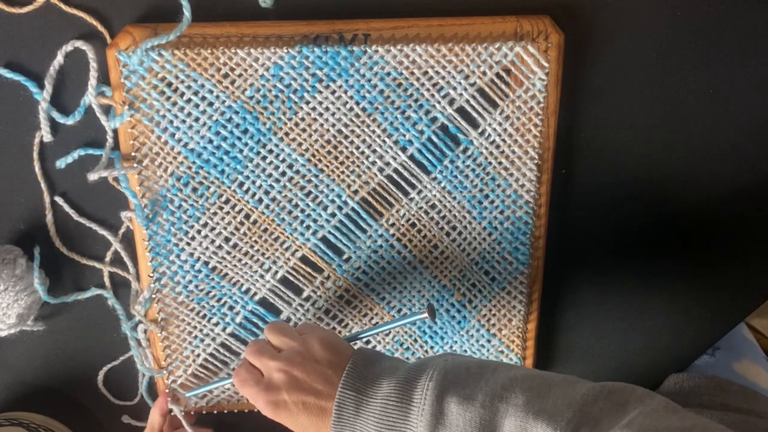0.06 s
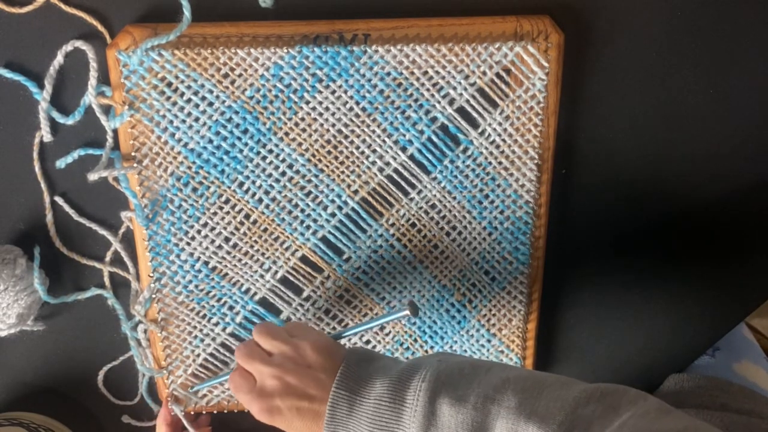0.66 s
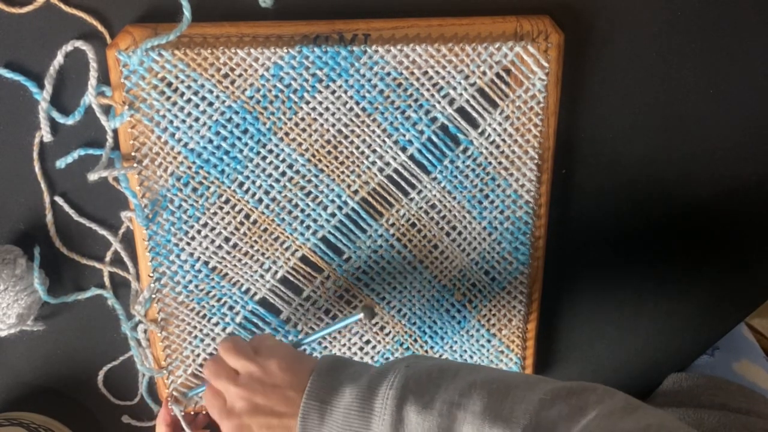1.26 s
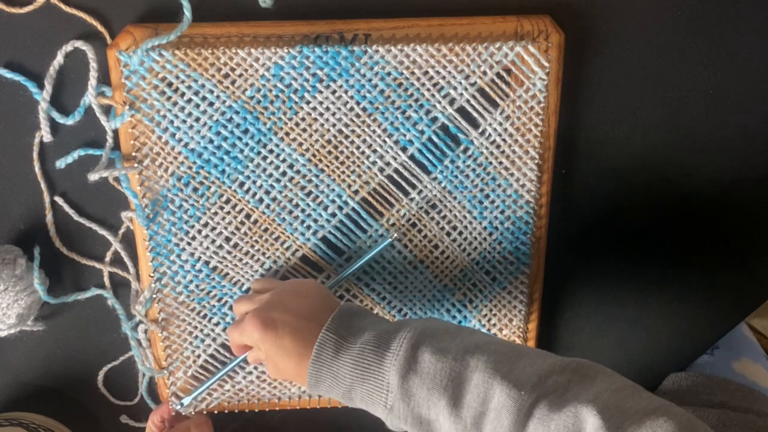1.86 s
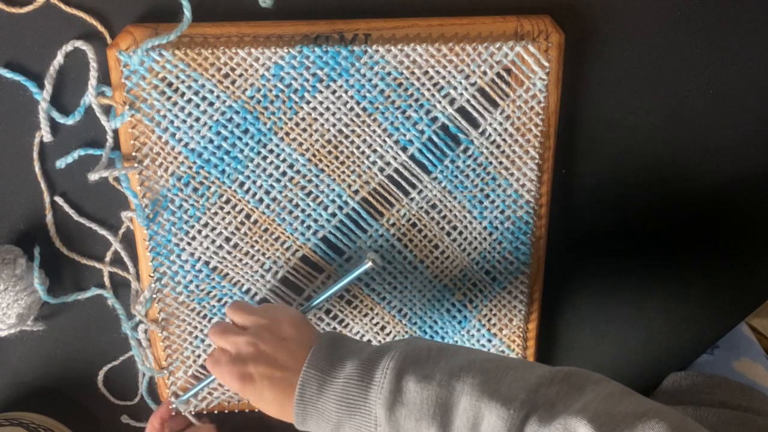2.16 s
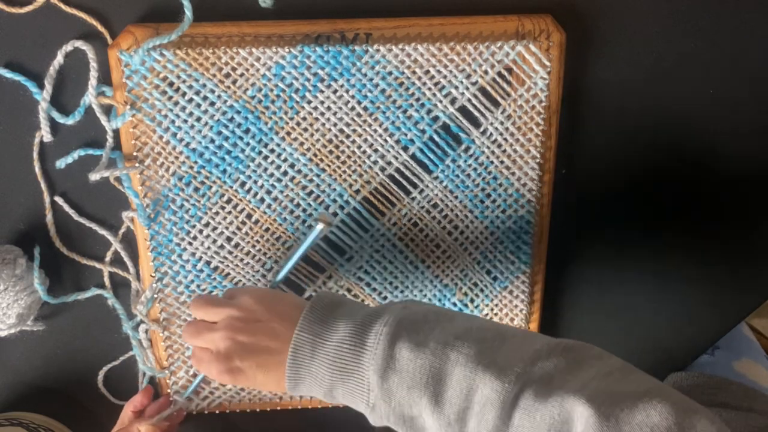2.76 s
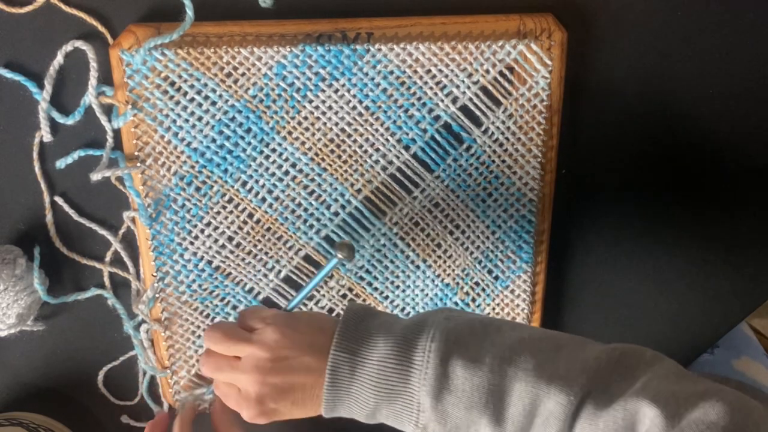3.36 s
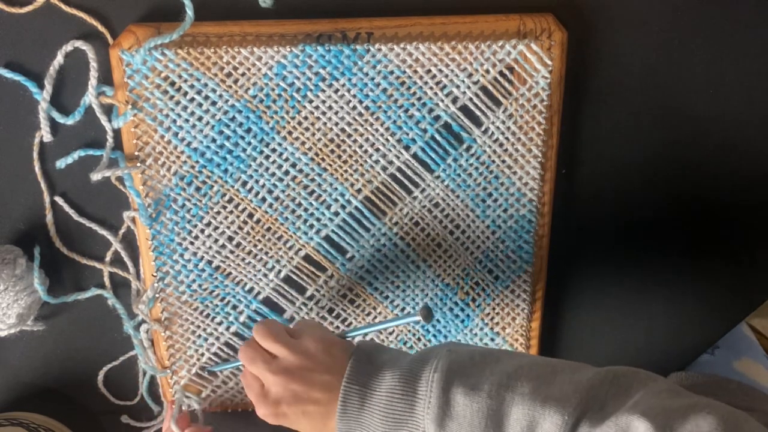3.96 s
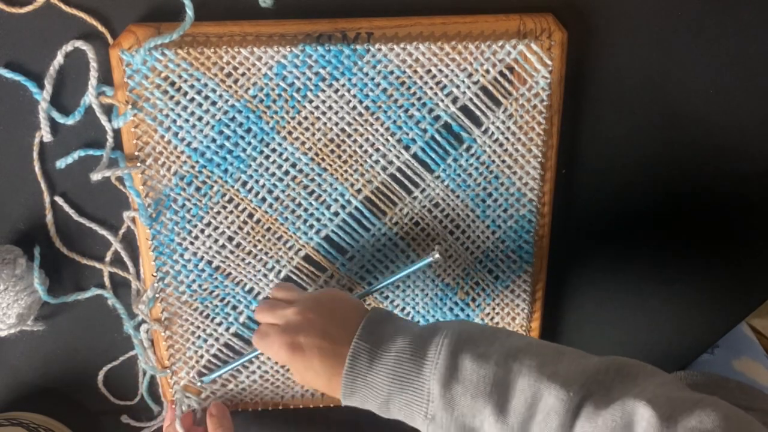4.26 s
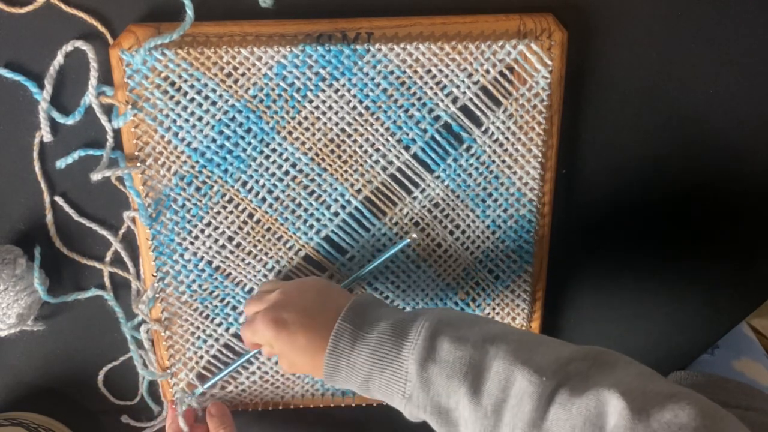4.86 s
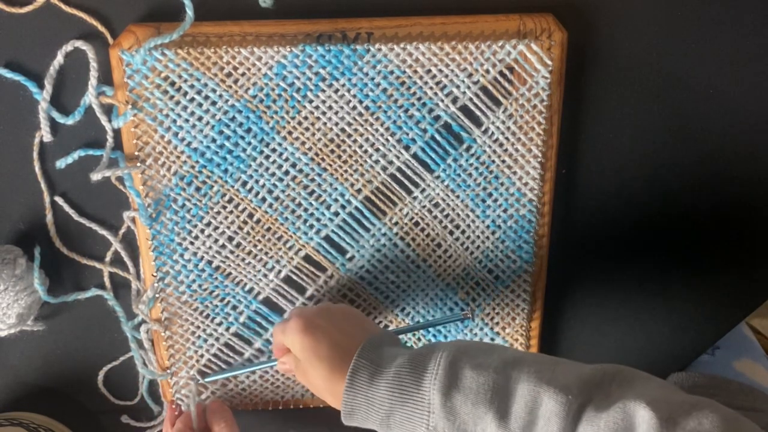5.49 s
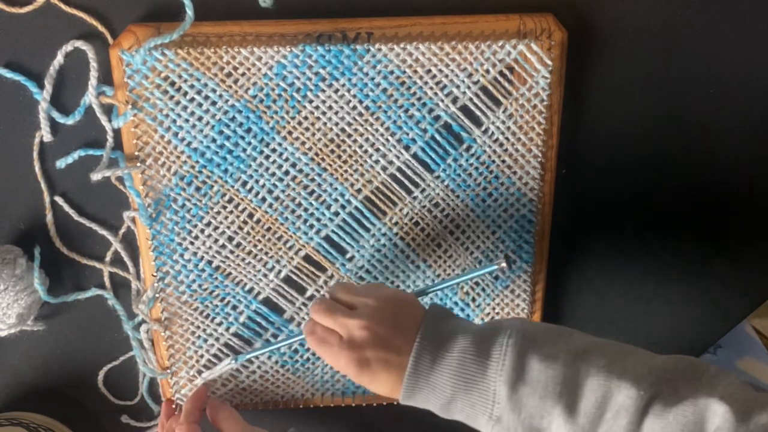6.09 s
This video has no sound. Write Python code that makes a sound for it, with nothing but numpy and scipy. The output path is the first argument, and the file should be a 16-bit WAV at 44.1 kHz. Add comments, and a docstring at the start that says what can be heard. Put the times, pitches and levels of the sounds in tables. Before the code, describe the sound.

A metal needle rubs softly through taut yarn on a wooden loom, with dull, hollow knocks and low thumps in a quiet room.

```python
"""In a quiet room's rumble and hiss, a long metal needle is woven through yarn on a wooden frame loom.
From the first stroke, yarn drags over the needle in tiny slips that ring the frame; the taut web drums
just after, then the loom rocks on its table. The hand's pushes thump and yarn scuffs faintly on the metal.
From 0.4 s threads snap off the tip and knock; from 1.2 s the tip now and then ticks on a peg. At 5.1 s
the rubbing rises in pitch on the short, taut corner threads; knocks and squeaks then crowd together."""
import sys
import numpy as np
from scipy import signal
from scipy.fft import rfft, irfft
from scipy.io import wavfile
from scipy.ndimage import uniform_filter1d

SR = 44100
rng = np.random.default_rng(int(sys.argv[2]) if len(sys.argv) > 2 else 0)


def generate_wav(signal):
    """Clip the signal to [-1, 1] and save it as 16-bit WAV at the path in sys.argv[1]."""
    frames = np.transpose(np.atleast_2d(signal))
    scaled = np.clip(frames, -1, 1) * 32767
    pcm = np.round(scaled).astype(np.int16)
    wavfile.write(sys.argv[1], SR, pcm)


N = 270330
T = np.arange(N) / SR
FREQS = np.maximum(np.fft.rfftfreq(N, 1 / SR), 1)

# Modes of the wooden frame, the yarn web and the loom on its table.
# Each row: frequency in Hz, relative level in dB, t60 in seconds at damping 1.
FRAME_MODES = [(285, -3, 0.24), (303.1, 1, 0.17), (317.9, 7, 0.069), (356.6, 4.5, 0.15),
               (333, -11.5, 0.019), (394.8, -8.5, 0.2), (442.3, -21, 0.099), (504.6, -20.5, 0.29),
               (533, -16, 0.14), (632.3, -18.5, 0.092), (691, -33.5, 0.22), (727, -30.5, 0.09),
               (750, -36.5, 0.032), (844, -45.5, 0.18), (1060, -48, 0.05), (1215, -49.5, 0.04)]
WEB_MODES = [(125.5, 2, 0.11), (143.35, 7.5, 0.17), (166.5, -19.5, 0.43), (189.1, -15.5, 0.19)]
ROCK_MODES = [(51.44, 3, 0.59), (74, 3, 0.12), (103.7, -12, 0.085)]
# Threads snapping off the needle. Each row: time in seconds, knock level in dB, knock pitch in Hz,
# crack level in dB, web level in dB.
SNAPS = [(0.421, -31, 336, -61, -37), (0.441, -40.5, 347, -52.5, -29.5), (0.584, -43.5, 344, -79, -50.5),
         (0.744, -37, 352.4, -49, -47.5), (1.190, -29.5, 382, -41.5, -22), (1.218, -32, 366, -45, -36.5),
         (1.242, -30.5, 368, -48.5, -22.5), (1.830, -28, 332, -45.5, -24), (1.968, -27, 353, -45, -39.5),
         (2.182, -23, 345, -47.5, -42.5), (2.456, -30.5, 353, -50, -32.5), (3.195, -33, 332, -43.5, -33),
         (3.666, -35, 337, -49, -28.5), (4.524, -33, 357, -46.5, -26), (5.017, -25, 375.4, -35.5, -33),
         (5.06, -28, 362, -35.5, -23), (5.463, -34.5, 330, -68, -53.5), (5.552, -30.5, 365, -61, -57),
         (5.587, -28.5, 368, -50, -46), (5.652, -28, 347, -55, -37.5), (5.690, -33, 380, -59.5, -41),
         (5.751, -29.5, 362, -50.5, -44), (5.794, -27, 409, -55, -36), (5.826, -35.5, 402, -56.5, -37.5),
         (5.878, -18, 331.3, -53, -22.5), (5.95, -28, 370, -52.5, -30)]


def undb(db):
    """Decibels to gain."""
    return 10 ** (np.asarray(db) / 20)


def unit(x):
    """Scale to rms 1."""
    return x / np.sqrt(np.mean(x ** 2))


def add(out, start_s, x):
    """Mix x into out at start_s."""
    i = max(int(start_s * SR), 0)
    out[i:i + len(x)] += x[:N - i]


def over_hz(points):
    """Interpolate (Hz, value) points over log frequency."""
    hz, value = np.transpose(points)
    return np.interp(np.log(FREQS), np.log(hz), value)


def noise(gain):
    """Noise of rms 1, shaped by a gain per frequency."""
    return unit(irfft(rfft(rng.standard_normal(N)) * gain, N))


def resonance(hz, width_hz):
    """Gain of a steep-skirted resonance."""
    return 1 / (1 + ((FREQS / hz - hz / FREQS) * hz / width_hz) ** 2)


def decay(t, t60_s):
    """1 until t = 0, then down 60 dB per t60_s."""
    return np.exp(-np.log(1000) * np.maximum(t, 0) / t60_s)


def ring(modes, swell_cycles, tilt_db_oct=0, damping=1, scatter_db=0, hold_s=0, sharp=0):
    """A body's response to one push, peak 1: each mode builds up, and fades after hold_s."""
    t, sag_s = T[:SR // 2], 0.023
    bent_s = t + sharp * sag_s * (1 - np.exp(-t / sag_s))  # stretched yarn starts sharp, then sinks
    out = 0
    for (hz, db, t60_s), chance in zip(modes, rng.standard_normal(len(modes))):
        gain = undb(db + scatter_db * chance + tilt_db_oct * np.log2(hz / modes[0][0]))
        rise = 1 - np.exp(-(t * hz / swell_cycles) ** 2)
        out += gain * rise * decay(t - hold_s, t60_s / damping) * np.sin(2 * np.pi * hz * bent_s)
    return out / np.abs(out).max()


def air():
    """Room rumble common to both microphone ports, and hiss that is mostly each port's own."""
    # Each row of both: frequency in Hz, relative spectral level in dB.
    rumble_spectrum = [(20, 12.5), (28, 15.5), (42, 7.5), (62, 17.5), (100, 5.5), (150, -3.5), (220, -3),
                       (370, -13.5), (500, -44), (900, -71)]
    hiss_spectrum = [(600, -1), (1000, -8), (2300, -11), (3200, -14), (4800, -14), (6200, -18.5),
                     (7300, -37), (8600, -21.5), (10200, -20.5), (12400, -24.5)]
    rumble = noise(undb(over_hz(rumble_spectrum)))
    left, right, common = (noise(undb(over_hz(hiss_spectrum))) for _ in range(3))
    return undb(-47.5) * rumble + undb(-87) * common + undb(-69.5) * np.array([left, right])


def slips(per_s, spread_db):
    """Tiny stick-slip jerks at random times, a few stronger than the rest."""
    size = undb(spread_db * np.minimum(rng.exponential(size=N), 4)) * rng.choice([-1, 1], N)
    return size * (rng.random(N) < per_s / SR)


def driven(force, body):
    """A body kept ringing by a force, its short-term rms held near 1."""
    lead, window = len(body), int(0.026 * SR)
    looped = np.concatenate([force[-lead:], force])
    ringing = unit(signal.fftconvolve(looped, body)[lead:lead + N])
    power = uniform_filter1d(uniform_filter1d(ringing ** 2, window), window)
    return ringing / np.sqrt(power + 1e-4)


def stroke_power(db, start_s, length_s, release_s, attack_s=0.016):
    """Power of one stroke: builds up to start_s, holds, dies away."""
    fade = np.maximum(start_s - T, 0) / attack_s + np.maximum(T - start_s - length_s, 0) / release_s
    return (undb(db) * np.exp(-np.minimum(fade, 20))) ** 2


def effort():
    """Gains of frame, web and rocking, and the yarn's grip: strokes add power to the leaning hand's."""
    # Each row: start in seconds, length in seconds, frame level in dB, web level in dB, grip from 0 to 1.
    strokes = [(0.0, 0.062, -51, -41.5, 1), (0.199, 0.027, -45, -56.5, 0.25), (0.322, 0.045, -53.5, -70, 1),
               (0.374, 0.07, -46, -45.5, 1), (0.76, 0.011, -45.5, -41.5, 0), (0.816, 0.04, -58, -41, 0),
               (1.214, 0.035, -39.5, -27.5, 0.12), (1.536, 0.042, -49.5, -45, 1),
               (1.636, 0.065, -54.5, -35, 1), (1.774, 0.063, -54.5, -42.5, .8),
               (1.84, 0.033, -41.5, -25, 0.15), (1.949, 0.07, -33.5, -30, 0.16),
               (2.134, 0.13, -46.5, -32.5, 0.37), (2.32, 0.24, -53, -44, 0.3),
               (2.473, 0.046, -44.5, -34, 0), (2.749, 0.093, -48.5, -64, 1), (2.823, 0.12, -52.5, -45, 1),
               (3.177, 0.0077, -44, -47, 0.7), (3.246, 0.018, -68, -39, 0.2), (3.298, 0.14, -58, -49, 0),
               (3.437, 0.051, -77, -48.5, 0), (3.627, 0.034, -44, -37.5, 0.08),
               (3.647, 0.046, -41.5, -33, 0.9), (3.706, 0.047, -73, -38.5, 0.1),
               (3.868, 0.036, -59, -49, 0.1), (3.983, 0.073, -54, -52.5, 0.47), (4.162, 0.055, -83, -44, 0),
               (4.239, 0.13, -58, -49.5, 0.6), (4.527, 0.054, -42, -31, 0.27),
               (4.876, 0.29, -50, -48.5, 0.07), (5.023, 0.13, -36.5, -27.5, 0.56),
               (5.184, 0.31, -52, -46.5, 0.5), (5.589, 0.3, -43, -40.5, 0.55),
               (5.904, 0.03, -49.5, -28.5, 0.1), (6.048, 0.21, -47, -37, 0.3)]
    # The hand bearing on the loom. Each row: time in seconds, relative rubbing level in dB.
    lean = [(0.0, -62.5), (0.36, -63.5), (0.99, -62), (1.96, -45.5), (2.05, -38.5), (2.59, -49),
            (3.07, -46), (3.48, -59), (3.89, -52), (4.03, -89), (4.23, -50), (4.46, -54.5), (4.74, -50.5),
            (4.9, -81), (5.07, -47.5), (5.46, -39.5), (5.75, -34), (6.13, -39)]
    lean_db = np.interp(T, *np.transpose(lean))
    usual_lean_db = -62
    follow_db = 0.073 * (lean_db - usual_lean_db)  # the lows barely follow the lean
    frame, web, rock = (undb(db) ** 2 for db in (lean_db - 7.5, follow_db - 59, follow_db - 49.5))
    gripping, web_lag_s, rock_lag_s = 0, 0.0014, 0.03
    for start_s, length_s, frame_db, web_db, grip in strokes:
        rub = stroke_power(frame_db, start_s, length_s, release_s=0.019)
        frame += rub
        gripping += grip * rub
        web += stroke_power(web_db, start_s + web_lag_s, length_s, release_s=0.038)
        web += stroke_power(web_db - 16.5, start_s + length_s, 0, release_s=0.033)  # trembles on
        rock += stroke_power(web_db - 4.5, start_s + rock_lag_s, length_s, release_s=0.063)
    return np.sqrt(frame), np.sqrt(web), np.sqrt(rock), gripping / frame


def stalls(before_s, after_s, depth_db):
    """Gain dip around each snap: the needle stalls while a thread tightens on its tip."""
    held = np.zeros(N)
    for snap_s, *_ in SNAPS:
        held[(T > snap_s - before_s) & (T < snap_s + after_s)] = 1
    return undb(depth_db * uniform_filter1d(held, size=800))


def weaving(corner_s=5.1):
    """Dragging yarn rings frame and web and rocks the loom; a tighter grip sounds brighter."""
    frame_gain, web_gain, rock_gain, grip = effort()
    drag = rfft(slips(per_s=2000, spread_db=2.5))
    wood = ring(FRAME_MODES, swell_cycles=1.5)
    # Sliding feeds the frame's strongest modes; sharp catches reach the higher ones.
    gliding = driven(irfft(drag * resonance(388, width_hz=130), N), wood)
    catching = driven(irfft(drag * resonance(690, width_hz=600), N), wood)
    taut = driven(irfft(drag * resonance(410, width_hz=65), N), wood)
    sliding = np.where(T > corner_s, taut, gliding)
    pulse_db = 2.3 * noise(resonance(19, width_hz=14))  # the needle passes thread after thread
    frame = (sliding + grip * (catching - sliding)) * frame_gain * undb(pulse_db)
    web_slips = slips(per_s=210, spread_db=3)
    web = web_gain * driven(web_slips, ring(WEB_MODES, swell_cycles=0.76, damping=0.34))
    rock_slips = slips(per_s=120, spread_db=0.5)
    shudder = ring(ROCK_MODES, swell_cycles=0.77, tilt_db_oct=8.5, damping=0.39)
    rocking = rock_gain * driven(rock_slips, shudder)
    return (frame + web) * stalls(before_s=0.025, after_s=0.014, depth_db=-4.5) + rocking


def thumps():
    """The hand presses the loom down, and it shudders on the table."""
    # Each row: start in seconds, peak in dB, push length in seconds, tilt in dB per octave.
    pushes = [(0.01, -34.5, 0.17, -4), (0.809, -25.5, 0.025, -13), (0.991, -28.5, 0.075, -9.5),
              (1.653, -35.5, 0.046, 2), (1.854, -18, 0.034, 2.5), (1.982, -27.5, 0.075, -1.5),
              (2.066, -27.5, 0.01, 1), (2.228, -30, 0.064, -26.5), (3.214, -34.5, 0.018, 6.5),
              (3.664, -37, 0.16, -11), (3.861, -40, 0.012, -2), (4.303, -32.5, 0.029, -19.5),
              (4.587, -28, 0.058, -23.5), (4.88, -36, 0.17, -5.5), (5.152, -24, 0.071, -29.5),
              (5.619, -35, 0.2, -1), (5.887, -22.5, 0.016, 17)]
    out = np.zeros(N)
    for start_s, db, length_s, tilt in pushes:
        shudder = ring(ROCK_MODES, swell_cycles=0.75, tilt_db_oct=tilt, damping=1.35, hold_s=length_s)
        add(out, start_s, undb(db) * shudder)
    return out


def squeaks():
    """Yarn chatters along the needle: a breathy scuff when loose, a wavering pitch when tight. Just after the
    ticks at 4.52 s and 5.02 s, the tip rebounds off the peg in a brief high scrape."""
    # Each row: centre in seconds, length in seconds, level in dB, pitch in Hz, tightness from 0 to 1. # The
    # rows at 4.533 s and 5.033 s are the tip rebounding after a tick.
    rubs = [(0.04, 0.026, -81, 3970, 0.1), (0.355, 0.04, -81.5, 4020, 0), (1.24, 0.035, -82.5, 4200, 0),
            (1.955, 0.027, -84.5, 4130, 0), (1.963, 0.024, -81, 2220, 0.1), (2.174, 0.014, -77, 4220, 0.2),
            (2.21, 0.01, -80, 4750, 0.2), (2.806, 0.049, -78.5, 1940, 0), (3.0, 0.7, -86, 2270, 0.16),
            (3.179, .016, -76, 4220, 0.3), (3.215, .014, -81, 4140, 0.2), (4.533, 0.0066, -73.5, 4110, 0.2),
            (5.115, 0.02, -57, 2320, 0.9), (5.175, 0.011, -71, 2270, 0.37), (5.033, 0.0076, -77, 5630, 0.2),
            (5.587, 0.034, -75, 2240, 0.1), (5.746, 0.011, -66.5, 2280, 0), (5.784, 0.011, -71.5, 2250, 0),
            (5.869, 0.0096, -60, 1980, 1), (5.884, 0.01, -67.5, 2300, 0.4), (5.925, 0.028, -78, 2190, 0.3),
            (6.09, 0.071, -77.5, 2343, 0.35)]
    # Each row: frequency in Hz, width in Hz, relative level in dB.
    needle_rings = [(1971, 70, -5), (2270, 35, 0), (2352, 30, -1), (2443, 40, -8), (4272, 120, -7)]
    needle_gain = 1 + sum(undb(db) * resonance(hz, width_hz) for hz, width_hz, db in needle_rings)
    fibres = rfft(noise(needle_gain))
    wavering_s = np.cumsum(1 + 0.034 * noise(resonance(60, width_hz=120))) / SR
    out = np.zeros(N)
    for centre_s, length_s, db, hz, tight in rubs:
        scuff = unit(irfft(fibres * resonance(hz, width_hz=0.28 * hz), N))
        tone = np.sqrt(2) * np.sin(2 * np.pi * hz * wavering_s)
        fade_db = np.minimum(10 * ((T - centre_s) / length_s) ** 2, 200)
        out += undb(db - fade_db) * (np.sqrt(1 - tight) * scuff + np.sqrt(tight) * tone)
    chatter_db = 2.5 * noise(resonance(45, width_hz=80))  # fibres catch and let go
    return out * undb(chatter_db)


def knocks():
    """A thread snaps off the needle: the frame knocks hollowly and cracks, the heavier web drums."""
    # Short frame modes. Each row: frequency in Hz, relative level in dB, t60 in seconds.
    crack_modes = [(461.7, 3, 0.081), (530, 2.5, 0.13), (617.5, -9.5, 0.074), (669.7, -13, 0.14),
                   (736, -10, 0.062)]
    out, t = np.zeros(N), T[:SR // 2]
    swell_s, slip_lead_s = 0.0069, 0.00072  # the thread slips just before it snaps free
    swell = (t / swell_s * np.exp(1 - t / swell_s)) ** 3
    for snap_s, knock_db, hz, crack_db, web_db in SNAPS:
        hollow = swell * np.sin(2 * np.pi * hz * t)
        wood = ring(FRAME_MODES, swell_cycles=9.2, tilt_db_oct=-11.5, damping=1.5, scatter_db=6)
        crack = ring(crack_modes, swell_cycles=5, scatter_db=4)
        web = ring(WEB_MODES, swell_cycles=1.1, damping=1.1, hold_s=0.018, sharp=0.09)
        knock = undb(knock_db) * (hollow + undb(-9) * wood)
        add(out, snap_s - slip_lead_s, knock + undb(crack_db) * crack + undb(web_db) * web)
    return out


def ticks():
    """The tip scrapes a peg: dry noise that swells as it bites and dies in the yarn."""
    # Each row: time in seconds, t60 in seconds, resonances of that contact as (Hz, width in Hz, dB).
    contacts = [(1.184, 0.029, [(742, 210, -43), (1790, 260, -58.5), (2850, 510, -64), (3940, 270, -65.5),
                (4180, 260, -64.5)]), (1.827, 0.032, [(620, 200, -56.5), (1400, 500, -68),
                (2070, 560, -64.5), (3550, 2100, -79)]), (2.178, 0.05, [(757, 240, -49), (1980, 300, -70),
                (3440, 700, -69), (4270, 320, -57.5), (4970, 900, -77)]), (3.188, 0.018, [(580, 220, -57.5),
                (1200, 350, -62), (3480, 400, -65), (4230, 500, -58.5), (4750, 600, -69)]),
                (4.517, 0.19, [(645, 84, -51.5), (1740, 460, -66), (2670, 600, -76.5), (4160, 900, -72.5)]),
                (5.015, 0.047, [(700, 330, -46), (1070, 260, -50), (1320, 260, -56), (1780, 300, -59),
                (2180, 280, -69.5), (3180, 450, -65), (4250, 480, -67), (5640, 700, -73),
                (8220, 1200, -83)])]
    out, lead_s, attack_s = np.zeros(N), 0.016, 0.002
    t = T[:SR // 4] - lead_s
    bite = np.exp(np.minimum(t, 0) / attack_s)
    for peak_s, t60_s, resonances in contacts:
        power = sum((undb(db) * unit(resonance(hz, width_hz))) ** 2 for hz, width_hz, db in resonances)
        scrape = np.sqrt(power.mean()) * noise(np.sqrt(power))
        add(out, peak_s - lead_s, scrape[:len(t)] * bite * decay(t, t60_s))
    return out


def room(x, wet_db, t60_s=0.18, diffuse_hz=450):
    """Direct sound reaches two microphone ports a little apart; a short diffuse tail differs at each."""
    # Each row: frequency in Hz, left minus right in dB, phase lead of left in radians.
    ports = [(50, -.5, -.15), (110, -1.2, -.15), (155, -3.2, -.3), (240, -2, -.5), (360, -3.7, -.5),
             (420, -1.2, -.85), (520, -3.8, -1.1), (620, -5, -1.7), (680, 1.5, -1.3), (760, -3, -1.2),
             (850, 2, -1.5), (1100, 2.5, -1.6), (2100, -2.5, -5.15), (4300, 0, -6.2)]
    balance_db = over_hz([(hz, db) for hz, db, _ in ports])
    lead_rad = over_hz([(hz, rad) for hz, _, rad in ports])
    left_gain = undb(balance_db / 2) * np.exp(1j * lead_rad / 2)
    direct = np.array([irfft(rfft(x) * gain, N) for gain in (left_gain, 1 / left_gain)])
    t = T[:SR // 2]
    tails = rng.standard_normal((2, len(t))) * decay(t, t60_s) * (t > 0.006)
    tails = signal.sosfilt(signal.butter(1, diffuse_hz, "high", fs=SR, output="sos"), tails)
    wet = np.array([signal.fftconvolve(x, tail / np.linalg.norm(tail))[:N] for tail in tails])
    return direct + undb(wet_db) * wet


def scene():
    """Loom and needle, close by in a quiet room."""
    loom = room(weaving() + knocks() + thumps(), wet_db=-7.5)
    tip = room(ticks(), wet_db=-4)
    shaft = room(squeaks(), wet_db=-1.5)
    return loom + tip + shaft + air()


def record(dry, low_hz=27, top_hz=12450):
    """Cut the deepest bass and the top."""
    bass_cut = signal.butter(3, low_hz, "high", fs=SR, output="sos")
    top_cut = signal.ellip(8, 0.2, 70, top_hz, fs=SR, output="sos")
    return signal.sosfilt(top_cut, signal.sosfilt(bass_cut, dry))


dry = scene()
out = record(dry)
generate_wav(out)
```